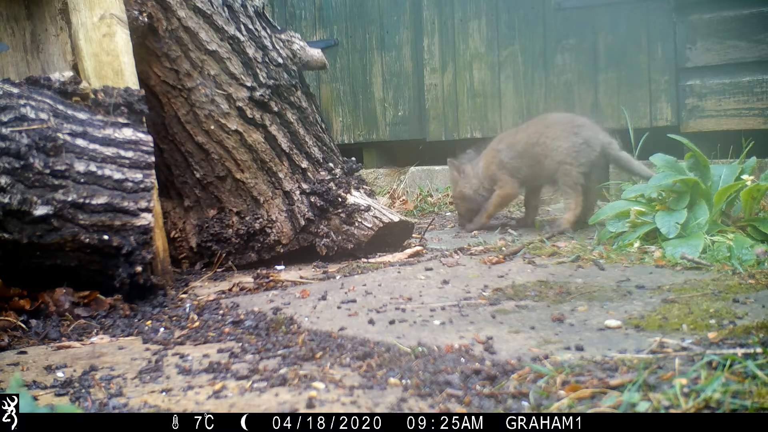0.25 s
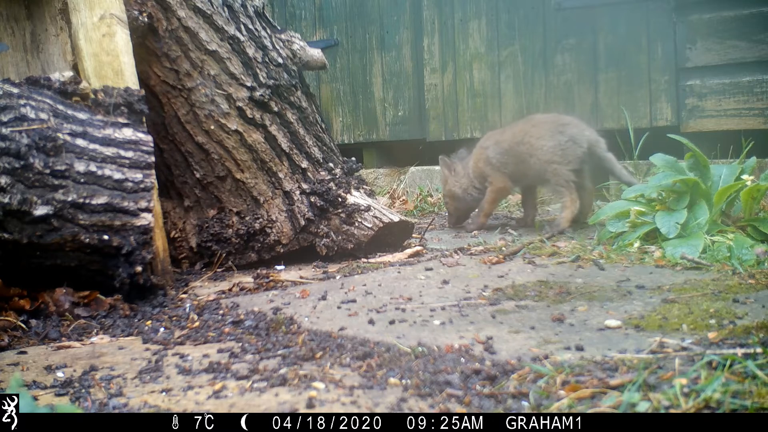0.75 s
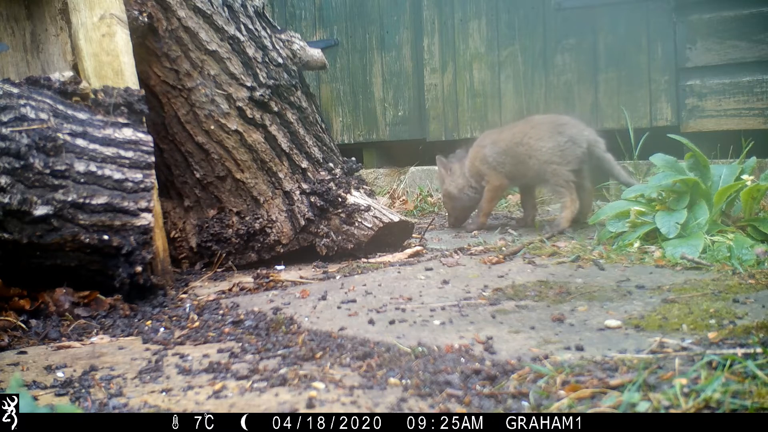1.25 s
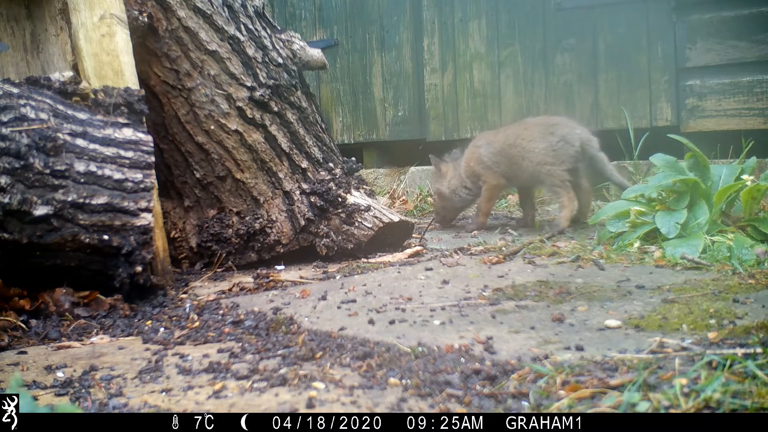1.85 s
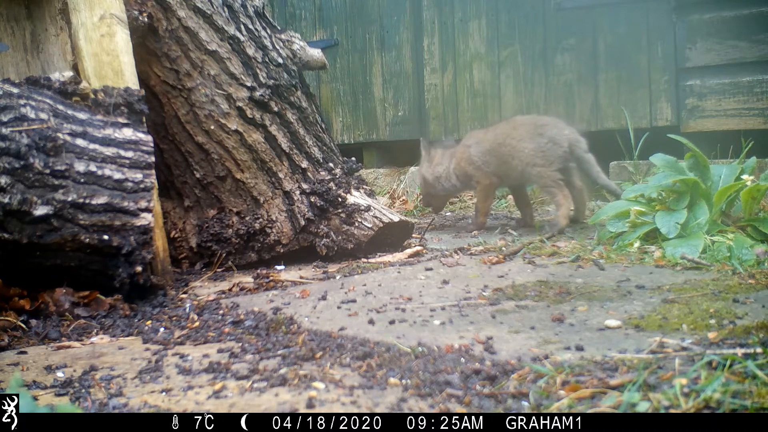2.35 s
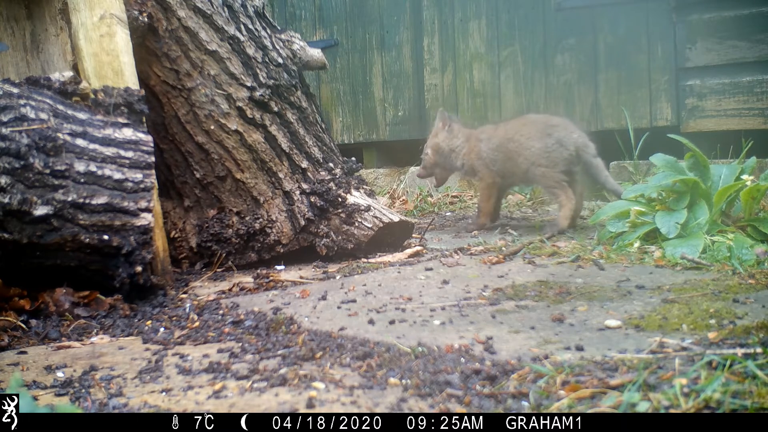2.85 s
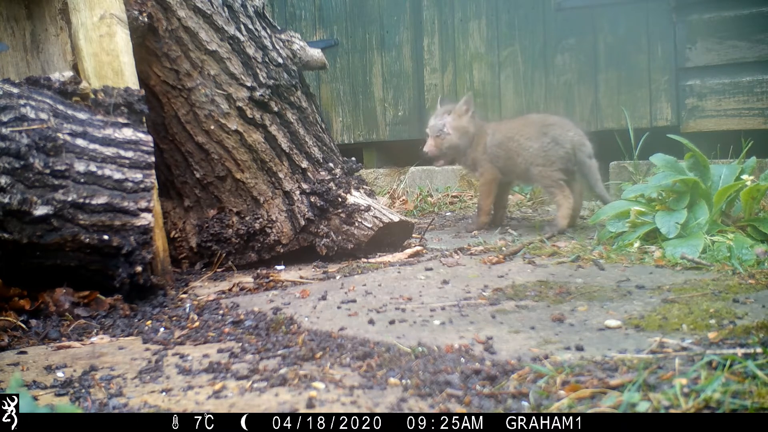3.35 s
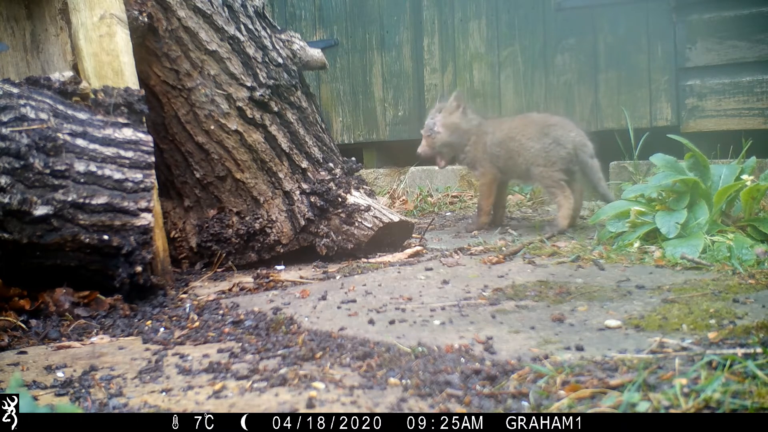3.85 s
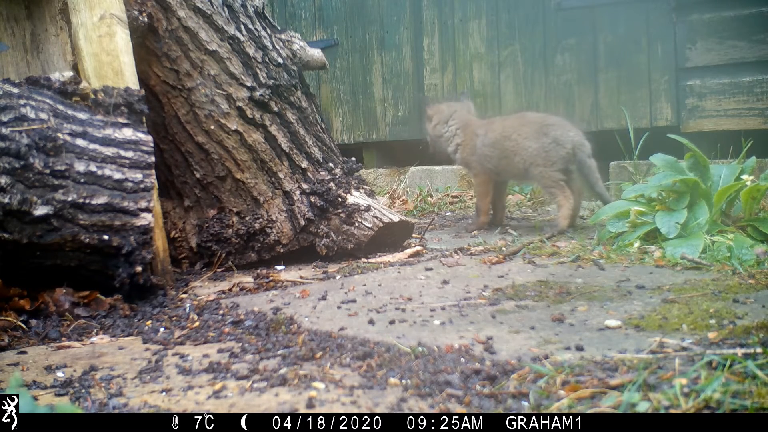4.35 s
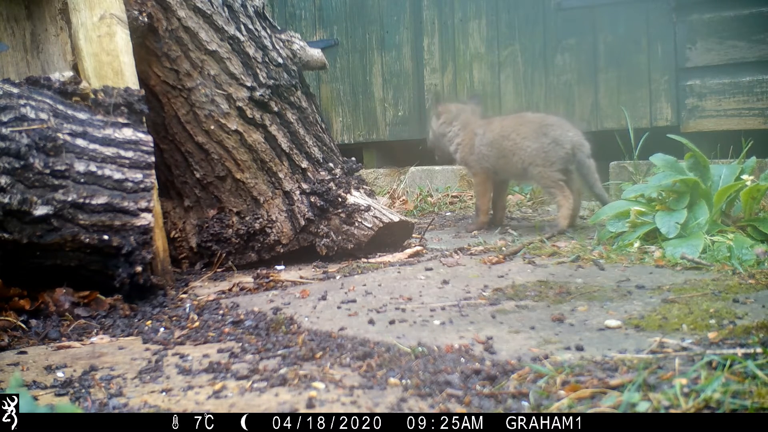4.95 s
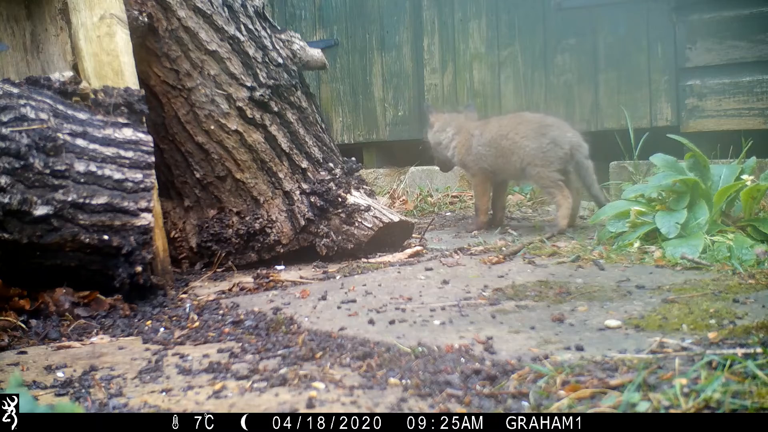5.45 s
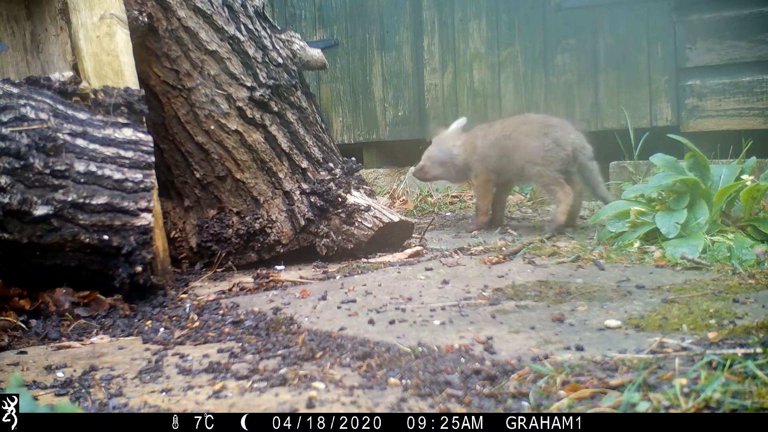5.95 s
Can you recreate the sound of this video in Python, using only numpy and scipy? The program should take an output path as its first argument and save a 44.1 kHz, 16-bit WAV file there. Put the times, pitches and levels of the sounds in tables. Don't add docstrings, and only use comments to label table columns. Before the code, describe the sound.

A damp garden heard through a small camera microphone: steady dull distant traffic, low hiss, a very faint high whine and fine buzzing ticks, slightly grainy from compression. At about 0.3 s come a quiet croak and low grunt. From 0.8 to 2.9 s a bird rattles out harsh, throaty chatter, about two dozen raspy syllables at roughly ten per second, quickly growing to a steady strength, with short echoes from wooden fences. Faint high whistles, mostly falling, dot 0.5 to 2.9 s. Then it calms. Around 3.4 s there is a small warble and a soft croak, with low grunts until 4 s. From 4.1 to 4.5 s light paw taps and scrapes rustle beneath a faint quick trill that lasts until about 4.8 s. Quiet background follows until 5.78 s, when a water drop makes one very loud, dry, distorted click. A barely audible deep thud comes at 6.1 s.

```python
import sys
import numpy as np
from scipy import signal
from scipy.fft import rfft, irfft, next_fast_len
from scipy.io import wavfile
from scipy.ndimage import uniform_filter1d

SR = 44100
rng = np.random.default_rng(int(sys.argv[2]) if len(sys.argv) > 2 else 0)


def how_loud(loudness_db):
    steps = np.asarray(loudness_db, float) / 20
    return 10 ** steps


def file_out(sig):
    cols = np.atleast_2d(sig).T
    lim = np.clip(cols, -1, 1)
    pcm = np.round(lim * 32767).astype(np.int16)
    wavfile.write(sys.argv[1], SR, pcm)


N = 273361


def rms_one(x):
    return x / np.sqrt(np.mean(x ** 2) + 1e-20)


def butter(x, order, hz, kind="low"):
    return signal.sosfilt(signal.butter(order, hz, kind, fs=SR, output="sos"), x)


def coloured(spectrum):
    hz, db = np.transpose(spectrum)
    size = next_fast_len(N)
    bins_hz = np.maximum(np.arange(size // 2 + 1) * SR / size, 1)
    shape = how_loud(np.interp(np.log(bins_hz), np.log(hz), db))
    noise = irfft(rfft(rng.standard_normal(size)) * shape, size)
    return rms_one(noise[:N])


def resonance(x, hz, width_hz):
    r = np.exp(-np.pi * width_hz / SR)
    zeros = np.array([1, 0, -1]) * (1 - r * r) / 2
    poles = [1, -2 * r * np.cos(2 * np.pi * hz / SR), r * r]
    return signal.lfilter(zeros, poles, x + 1e-18)


def add(out, s, part):
    at = round(s * SR)
    out[at:at + len(part)] += part[:N - at]


def garden(x, wet_db, wood_hz):
    # (delay [s], level [dB])
    reflections = [(.0071, -10), (0.028, -6.5), (0.045, -11.5), (.062, -19)]
    t60_s, tail_db = 0.23, -2
    t = np.arange(SR // 2) / SR
    tail = rng.standard_normal(len(t)) * how_loud(-60 * t / t60_s) * (t > .008)
    response = how_loud(tail_db + wet_db) * tail / np.sqrt(np.sum(tail ** 2))
    for delay_s, db in reflections:
        response[round(delay_s * SR)] += how_loud(db + wet_db)
    response = butter(response, 2, wood_hz)
    response[0] = 1
    return signal.fftconvolve(x, response)[:N]


def town():
    # (frequency [Hz], density [dB per Hz])
    spectrum = [(25, -16.5), (60, -15), (130, -10.5), (260, -5), (500, -2), (850, 0.5), (1300, -0.5),
                (1900, -6.5), (2800, -11.5), (4000, -22), (5300, -32.5), (6500, -43), (9500, -42),
                (15300, -43)]
    # (time [s], level [dB])
    loudness = [(0.0, -57.5), (1.601, -58), (3.0, -58), (4.5, -58), (6.2, -58)]
    s, db = np.transpose(loudness)
    level = how_loud(np.interp(np.arange(N) / SR, s, db) + 4.5)
    return level * coloured(spectrum[:-2] + [(8500, -61.5)])


def electronics():
    hiss_db, tick_db, whine_db, overtone_db = -83.5, -46.5, -73.5, -108
    whine_hz, flip_s, first_flip_s = 7797.5, .016802, .0040
    t = np.arange(N) / SR
    sign = (-1.) ** np.floor((t - first_flip_s) / flip_s)
    carrier = np.sqrt(2) * np.sin(2 * np.pi * whine_hz * t)
    whine = how_loud(whine_db) * uniform_filter1d(sign, size=30) * carrier
    whine = 1.12 * butter(whine, 2, 9000)
    overtone = how_loud(overtone_db) * np.sin(4 * np.pi * whine_hz * t)
    kicks = np.abs(np.diff(sign, prepend=sign[0])) / 2 * how_loud(1.7 * rng.standard_normal(N))
    ticks = how_loud(tick_db) * butter(kicks, 2, [3000, 6500], "band")
    return whine + overtone + ticks + how_loud(hiss_db) * rng.standard_normal(N)


def scuffs():
    # (time [s], length [s], level [dB], resonance [Hz])
    croaks = [
        (0.298, .08, -53, 1340),
        (0.356, .03, -52, 730),
        (3.43, .16, -54, 1220),
        (3.743, .03, -57, 790),
        (3.989, .05, -54.5, 590),
    ]
    # (time [s], length [s], level [dB], resonance [Hz])
    paws = [
        (4.1, 0.0071, -48, 920),
        (4.153, 0.1, -49.5, 870),
        (4.167, .04, -53.5, 316),
        (4.263, 0.021, -51, 1070),
        (4.449, .01, -48, 785),
        (4.518, .02, -56.5, 895),
        (6.11, 0.052, -66.5, 59.6),
    ]
    croak_width_hz, paw_width_share, grains_per_s = 440, 0.95, 950
    rows = [(*row, croak_width_hz) for row in croaks]
    rows += [(*row, paw_width_share * row[3]) for row in paws]
    out = np.zeros(N)
    for s, length_s, db, hz, width_hz in rows:
        size = round(length_s * SR)
        chance = rng.random((2, SR // 4))
        grains = (chance[0] < grains_per_s / SR) * (chance[1] - .5)
        grains[size:] = 0
        grains[:size] *= np.sin(np.pi * np.linspace(.05, 1, size) ** 0.92)
        grains[size // 4] += .5
        rung = resonance(resonance(grains, hz, width_hz), hz, 0.94 * width_hz)
        rung = butter(rung, 4, 1800)
        add(out, s, how_loud(db) * rung / np.sqrt(np.sum(rung ** 2) / size))
    return out


def whistle(hz, level):
    return level * np.sin(2 * np.pi * np.cumsum(hz) / SR)


def glide(length_s, start_hz, end_hz, sag, db):
    u = np.linspace(0, 1, round(1.1 * length_s * SR))
    hz = start_hz + (end_hz - start_hz) * u - 4 * sag * abs(end_hz - start_hz) * u * (1 - u)
    tremor = 1 + 0.18 * np.sin(2 * np.pi * 40 * length_s * u + 6 * rng.random())
    tilt = (hz / hz.mean()) ** -3.0
    return whistle(hz, how_loud(db + 4.0) * tilt * np.sin(np.pi * u) ** .5 * tremor)


def warble():
    length_s, centre_hz, peak_db = 0.096, 4500, -53.5
    waver_per_s, waver_hz, flutter_per_s, flutter_db = 19.4, 110, 60, 14
    swell_at_s, swell_db_per_s = 0.044, 230
    t = np.arange(0, length_s, 1 / SR)
    swing = np.cos(2 * np.pi * waver_per_s * (t - .011))
    flutter = np.cos(np.pi * flutter_per_s * (t - .027)) ** 2 * (1 - swing) / 2
    db = peak_db - flutter_db * flutter - swell_db_per_s * np.abs(t - swell_at_s)
    return whistle(centre_hz + waver_hz * swing, how_loud(db) * np.sin(np.pi * t / length_s) ** .3)


def trill_note():
    hook_s, hook_hz, hook_db = 0.0067, 6005, -72
    note_s, rest_hz, fall_s, note_db = 0.055, 3060, .021, -65
    beak_hz, beak_width_hz, beak_lift_db = 4550, 270, 8
    t = np.arange(0, note_s, 1 / SR)
    hz = rest_hz + (hook_hz - rest_hz) * np.exp(-np.maximum(t - hook_s, 0) / fall_s)
    db = np.interp(t, [hook_s, 2.0 * hook_s], [hook_db, note_db])
    db = db + beak_lift_db * np.exp(-((hz - beak_hz) / beak_width_hz) ** 2)
    return whistle(hz, how_loud(db) * np.sin(np.pi * t / note_s) ** .4)


def birds():
    # (time [s], top [Hz], bottom [Hz], level [dB])
    falls = [
        (.645, 5640, 5030, -84),
        (1.026, 5120, 4050, -65.5),
        (1.4, 6230, 3900, -70),
        (1.587, 5980, 3930, -67),
        (1.783, 5500, 4020, -67.5),
        (1.94, 6170, 4280, -71),
        (2.136, 5600, 4300, -69),
        (2.694, 5430, 3260, -66.5),
    ]
    # (time [s], bottom [Hz], top [Hz], level [dB])
    rises = [
        (0.713, 4220, 5330, -68),
        (1.115, 5800, 6500, -80),
        (1.275, 4770, 5200, -74.5),
        (2.319, 4100, 4570, -70),
        (4.855, 6550, 6850, -88.5),
    ]
    # (time [s], length [s], start [Hz], end [Hz], level [dB])
    held = [
        (.555, .025, 4260, 4360, -73.5),
        (0.973, 0.06, 5390, 5020, -70),
        (1.165, .03, 6800, 6620, -84),
        (2.555, 0.016, 5670, 5400, -80),
        (2.668, 0.028, 5620, 5250, -73.5),
        (2.824, 0.079, 5900, 6030, -79),
        (3.953, 0.067, 6200, 5830, -73.5),
        (4.875, .08, 6880, 6680, -92),
    ]
    fall_hz_per_s, fall_sag = 36000, 0.087
    rise_hz_per_s, rise_sag = 19000, 0.3
    trill_s, trill_every_s, trill_notes = 4.0615, .0869, 9
    leaves_t60_s, leaves_db = 0.1, -2.5
    out = np.zeros(N)
    for s, top, bottom, db in falls:
        add(out, s - .003, glide((top - bottom) / fall_hz_per_s, top, bottom, fall_sag, db))
    for s, bottom, top, db in rises:
        add(out, s - .003, glide((top - bottom) / rise_hz_per_s, bottom, top, rise_sag, db))
    for s, length_s, start, end, db in held:
        add(out, s - .003, glide(length_s, start, end, 0, db))
    add(out, 3.397, warble())
    for k in range(trill_notes):
        add(out, trill_s + k * trill_every_s, how_loud(rng.normal(0, 1.2)) * trill_note())
    t = np.arange(SR // 8) / SR
    scatter = rng.standard_normal(len(t)) * how_loud(-60 * t / leaves_t60_s)
    smeared = signal.fftconvolve(out, scatter / np.sqrt(np.sum(scatter ** 2)))[:N]
    return garden(out + how_loud(leaves_db) * smeared, wet_db=-7.5, wood_hz=9000)


def chatter():
    # (onset [s], level [dB])
    syllables = [(0.771, -42), (0.847, -36.5), (0.916, -36), (0.987, -36), (1.077, -35), (1.146, -35.5),
                 (1.23, -35), (1.323, -33), (1.404, -33.5), (1.498, -33), (1.592, -33.5), (1.683, -33),
                 (1.773, -33), (1.869, -32.5), (1.953, -34.5), (2.048, -33), (2.153, -34), (2.255, -33.5),
                 (2.349, -33), (2.441, -33), (2.536, -33.5), (2.634, -33.5), (2.733, -33), (2.837, -35)]
    # (frequency [Hz], width [Hz], level [dB])
    throat = [(714, 350, -17), (1189, 48, -9.5), (1340, 34, -5.5), (1543, 170, -10), (1693, 73, -11),
              (2050, 150, -0.5), (2202, 109, -1), (2340, 139, -1), (2875, 220, -7.5), (3117, 100, -14),
              (3920, 70, -35)]
    pulse_per_s, pulse_jitter, pulse_spread_db, rasp, puff_s = 110, .1, -2, 0.73, 0.0042
    voiced_share, last_breath_s, lead_s = 0.62, 0.1, .008
    beak_db, beak_arch = 1.0, 0.039

    gaps = SR / pulse_per_s * np.exp(pulse_jitter * rng.standard_normal(1200))
    at = np.cumsum(gaps).astype(int)
    pulses = np.zeros(N)
    pulses[at[at < N]] = how_loud(pulse_spread_db * rng.standard_normal(1200))[at < N]
    puffs = signal.lfilter([1], [1, -np.exp(-1 / (puff_s * SR))], pulses) * rng.standard_normal(N)
    source = (1 - rasp) * rms_one(pulses) + rasp * rms_one(puffs)

    modes = []
    for k, (hz, width_hz, db) in enumerate(throat):
        modes.append((-1) ** k * how_loud(db) / np.sqrt(width_hz) * resonance(source, hz, width_hz))
    modes = butter(modes, 8, 3380)
    steepness = 1.05 * (np.array(throat)[:, :1] / 2000) ** 0.91
    colours = how_loud(beak_db * rng.standard_normal((len(syllables), len(throat))))

    onsets = np.array(syllables)[:, 0]
    lengths = voiced_share * np.diff(onsets, append=onsets[-1] + last_breath_s)
    out = np.zeros(N)
    for (s, db), length_s, colour in zip(syllables, lengths, colours):
        u = np.linspace(0, 1, round(length_s * SR))
        start = round((s - lead_s) * SR)
        breath = np.sin(np.pi * u ** 0.96) ** steepness
        read = start + np.cumsum(1 + beak_arch * (2 * np.sin(np.pi * u) - 1.3))
        span = np.arange(2 * len(u)) + start
        bent = [np.interp(read, span, mode[start:start + 2 * len(u)]) for mode in modes]
        syllable = colour @ (breath * bent)
        add(out, s - lead_s, how_loud(db - 5.0) * rms_one(syllable))
    return garden(out, wet_db=2.9, wood_hz=2600)


def drop():
    # (time [s], signed size [full scale], rise [ms], fall [ms])
    kicks = [
        (5.77874, -16.4, .35, .157),
        (5.77953, 20, .67, .196),
        (5.77937, 2.65, .72, .45),
        (5.78044, .435, .31, .46),
        (5.7812, -.023, 1.5, 17),
    ]
    out = np.zeros(N)
    ms = np.arange(SR // 4) * 1000 / SR
    for s, size, rise_ms, fall_ms in kicks:
        add(out, s, size * (1 - np.exp(-(ms / rise_ms) ** 2)) * np.exp(-ms / fall_ms))
    return out


def starve(x):
    coarse = [0, 4, 9, 18, 20, 22, 25, 54, 58, 83, 94, 97, 113, 117, 124, 126, 147, 170, 233, 247]
    coarser = [209, 210, 218, 219, 254]
    very_coarse = [187, 188, 196, 212, 215]
    coarsest = [37, 38]
    steps_db, step_db_per_octave = (-37.5, -35, -32, -28.5), -5
    hop, first_frame = 941, 226
    n, k = np.arange(2 * hop), np.arange(hop)[:, None]
    window = np.sin(np.pi * (n + .5) / (2 * hop))
    basis = np.sqrt(2 / hop) * np.cos(np.pi / hop * (n + .5 + hop / 2) * (k + .5)) * window
    line_hz = (k[:, 0] + .5) * SR / (2 * hop)
    octaves = np.abs(np.log2(line_hz / 850))
    padded = np.pad(x, hop)
    out = padded.copy()
    for frames, step_db in zip((coarse, coarser, very_coarse, coarsest), steps_db):
        step = how_loud(step_db + step_db_per_octave * octaves)
        for frame in frames:
            at = first_frame + frame * hop
            lines = basis @ padded[at:at + 2 * hop]
            kept = np.sign(lines) * np.floor(np.abs(lines) / step + .42) * step
            out[at:at + 2 * hop] += (kept - lines) @ basis
    return out[hop:-hop]


def scene():
    return (chatter() + birds() + scuffs() + drop() + town())[None]


def roll_off(x):
    return signal.sosfilt(signal.butter(12, 16750, fs=SR, output="sos"), x)


def record(dry):
    clip = .975
    x = np.clip(butter(dry[0], 1, 13000), -clip, clip)
    noises = signal.sosfilt(signal.cheby2(10, 40, 15900, fs=SR, output="sos"), electronics())
    mix = starve(x + noises)[None]
    return roll_off(mix)


dry = scene()
out = record(dry)
file_out(out)
```